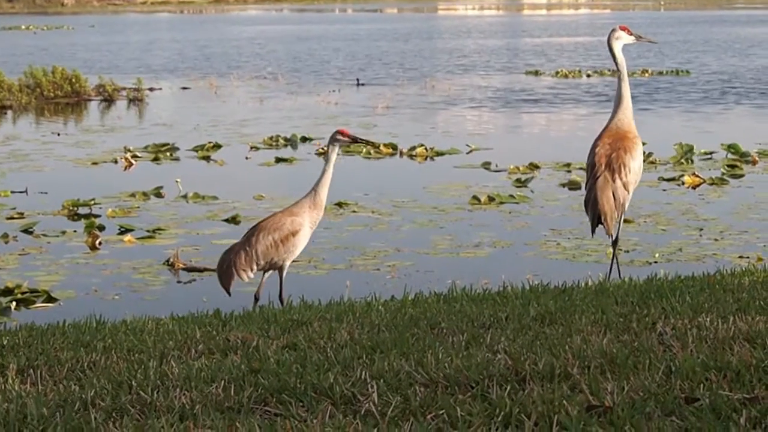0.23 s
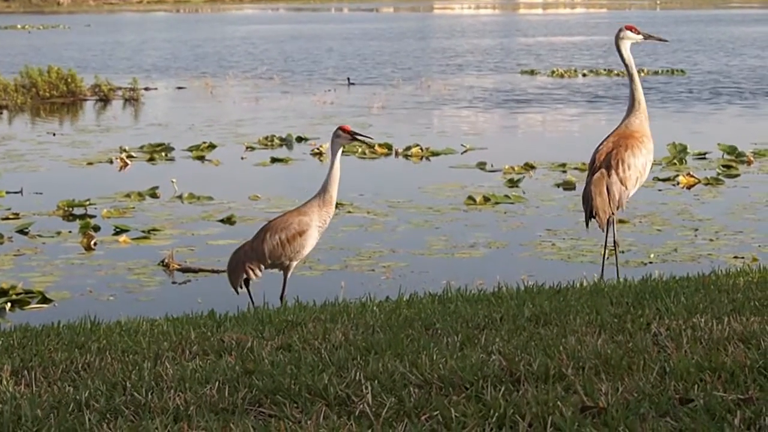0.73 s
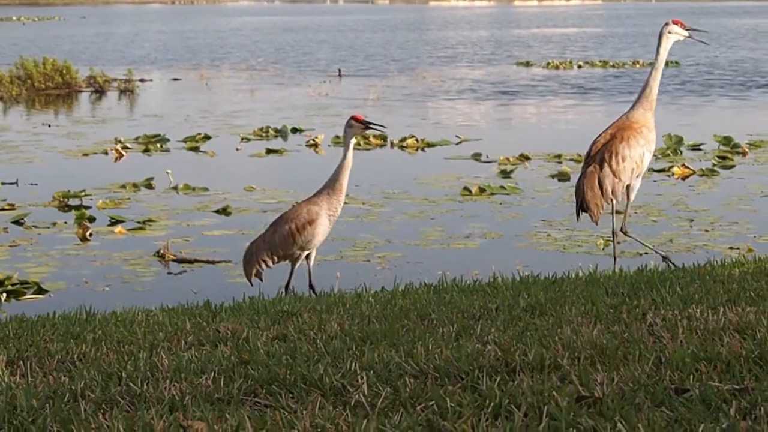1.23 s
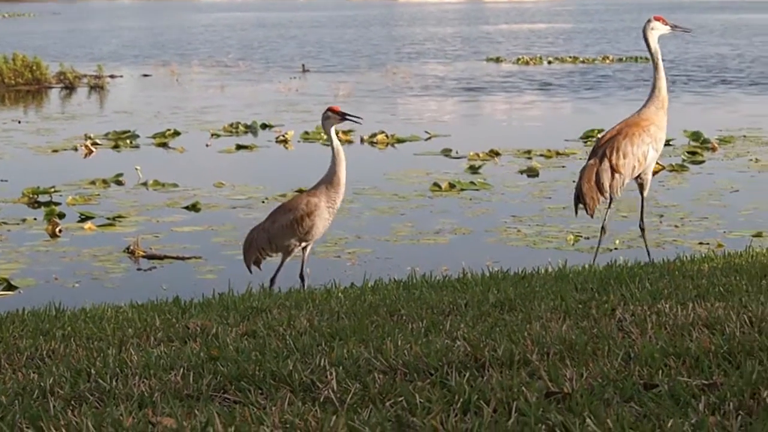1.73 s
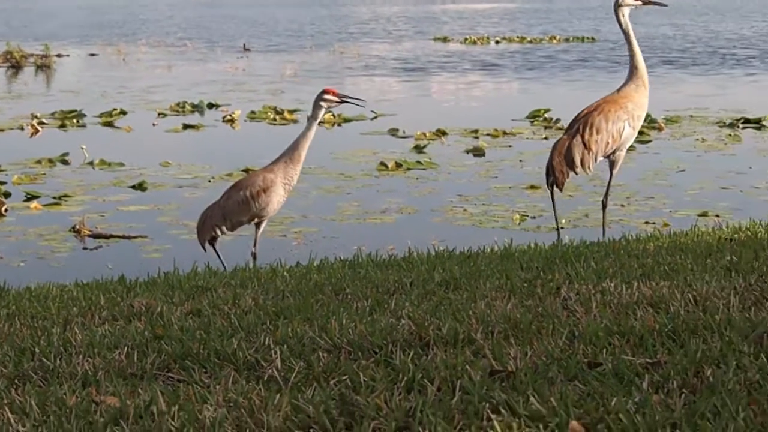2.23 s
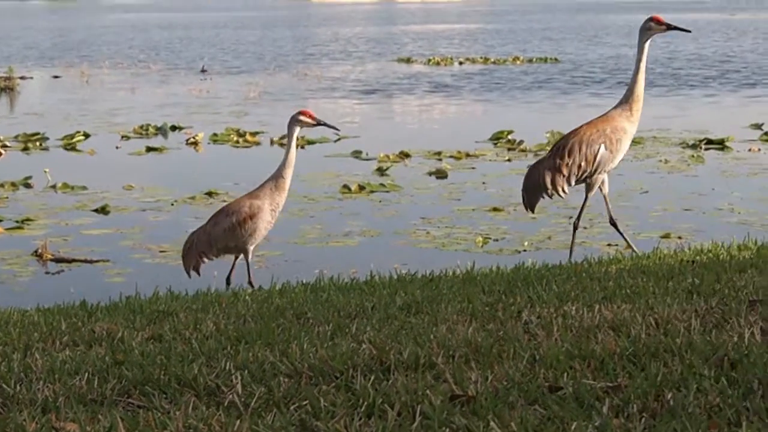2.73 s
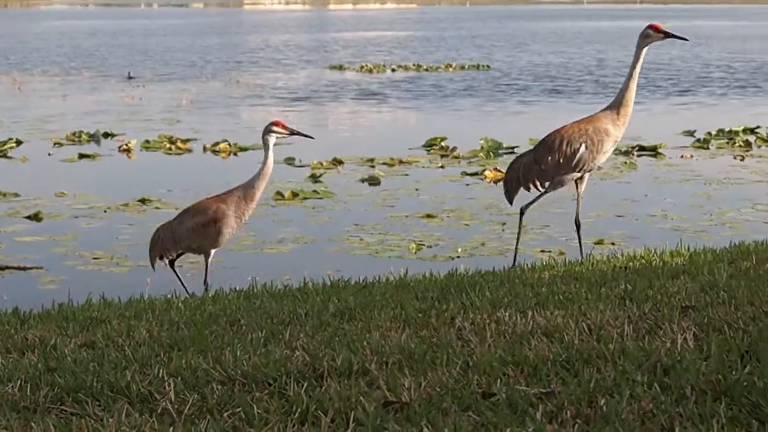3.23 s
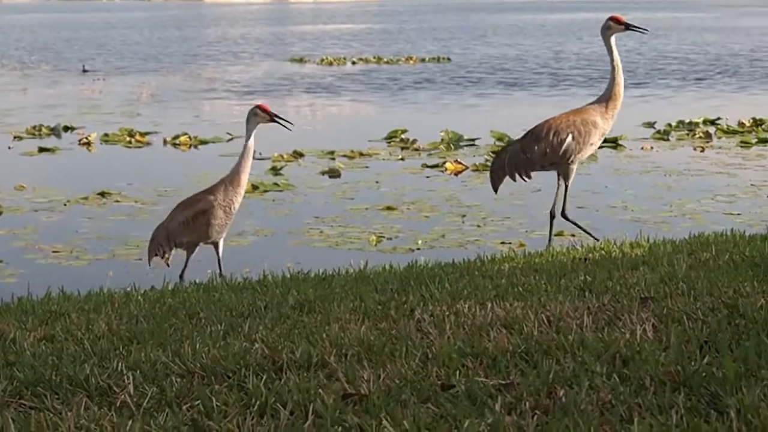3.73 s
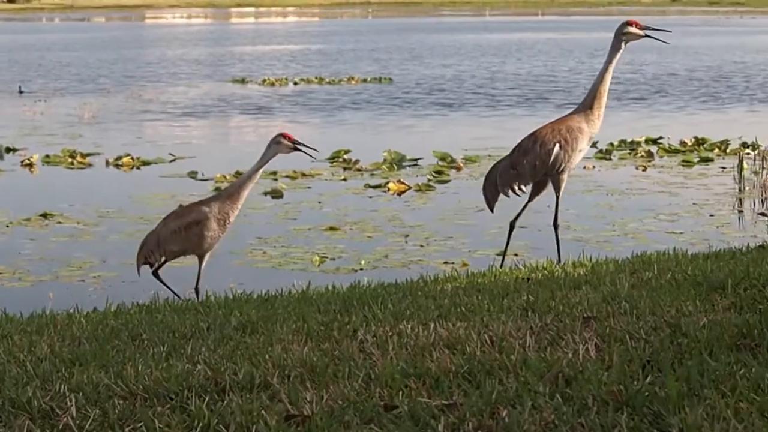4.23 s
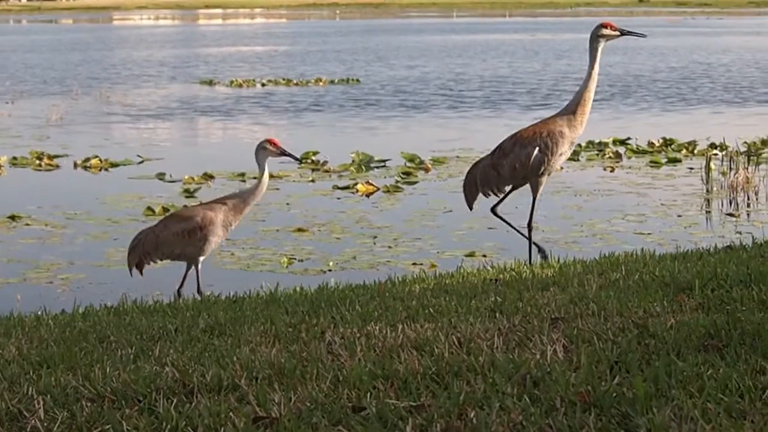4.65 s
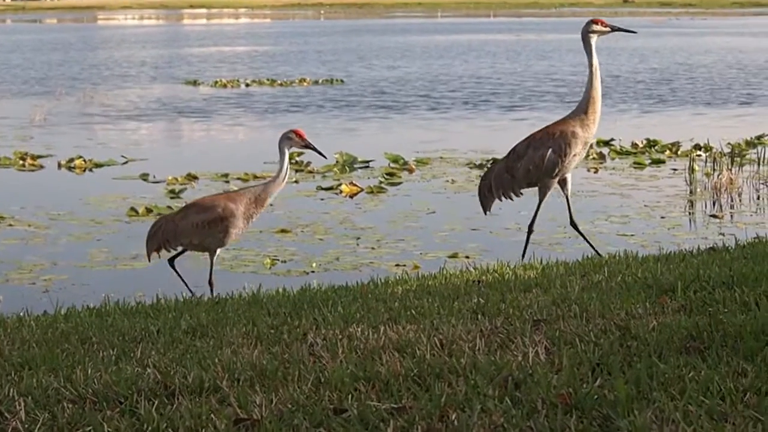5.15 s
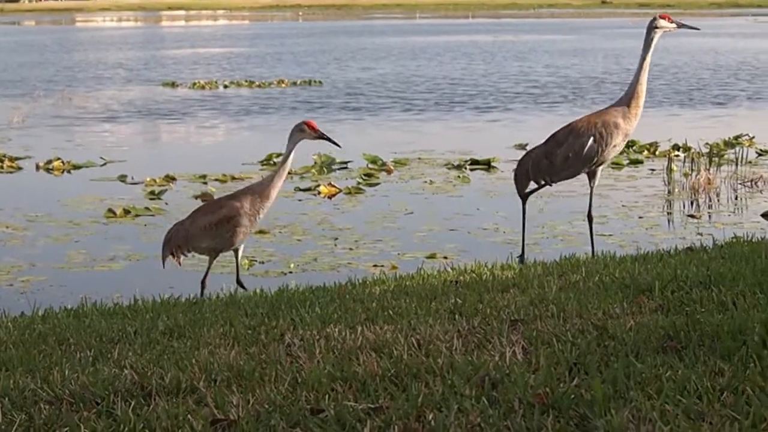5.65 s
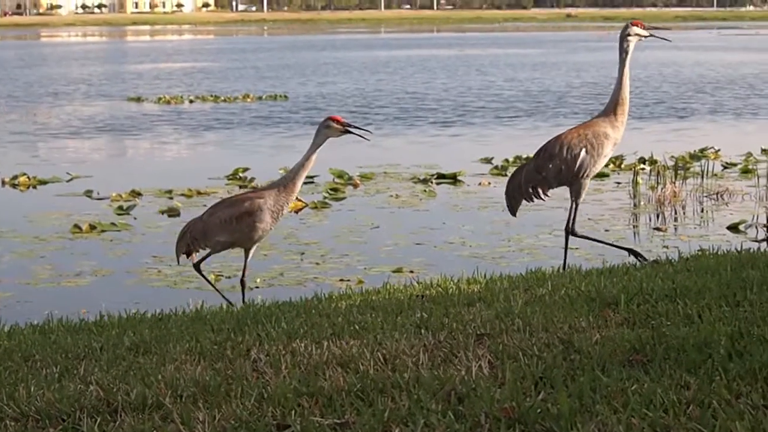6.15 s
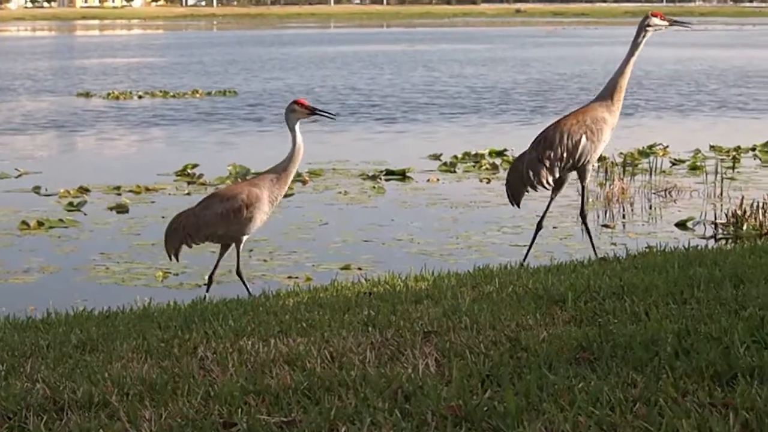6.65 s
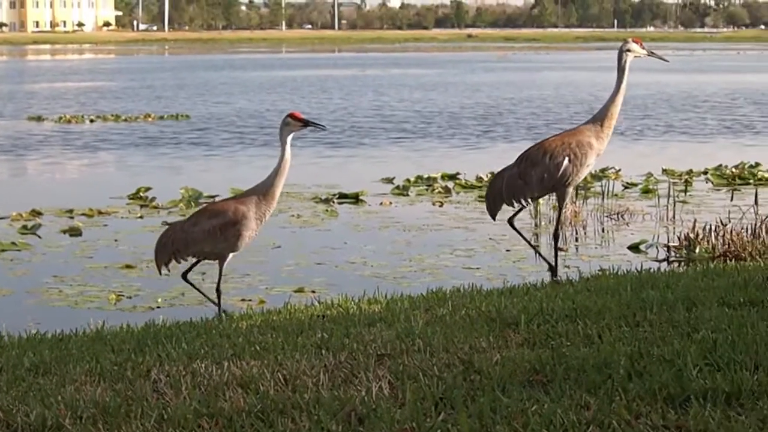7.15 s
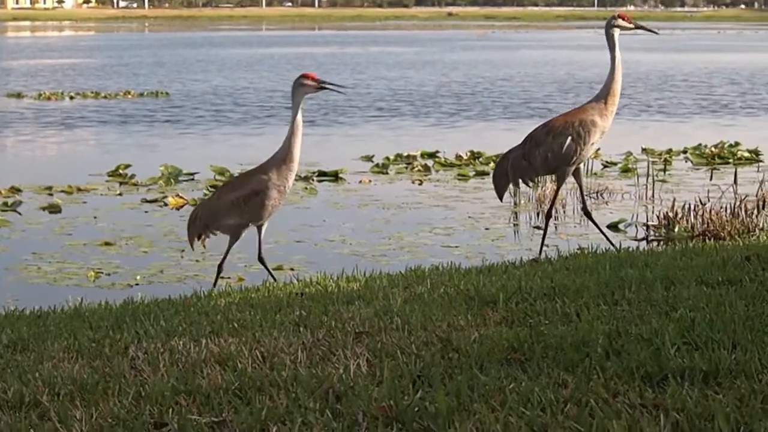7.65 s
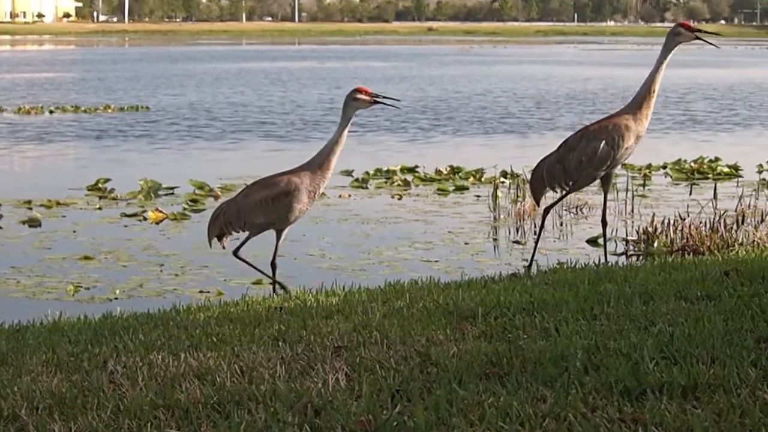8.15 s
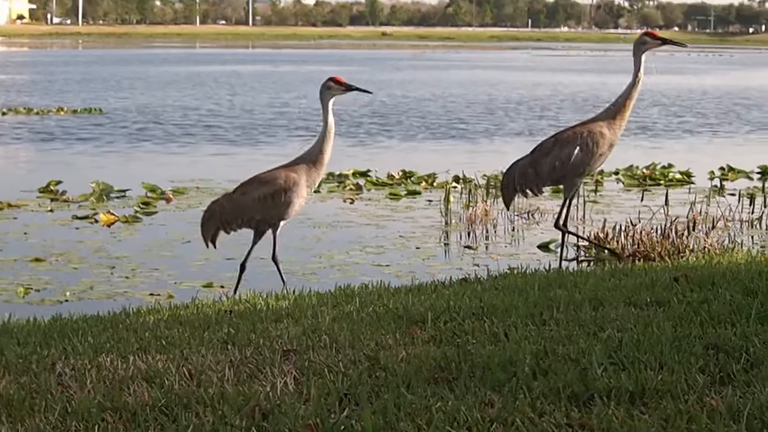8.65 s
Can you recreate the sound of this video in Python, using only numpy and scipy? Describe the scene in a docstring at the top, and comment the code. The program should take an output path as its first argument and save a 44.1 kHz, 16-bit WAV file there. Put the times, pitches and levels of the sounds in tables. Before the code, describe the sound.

Outdoors at a lake shore, a faint distant hush and a low engine hum open the scene, the hum fading by 1.5 s; a tiny chirp falls at 0.2. From 0.6 s a crane gives a short honk and a rough, hollow rolling rattle, joined at 1.1 by a second bird's tighter, clearer clucking roll. Another honk and shorter rattle follow at 1.8-2.3. Low wind rumbles through the pause, with dry ticks at 2.65 and 3.5. The duet returns at 3.65-4.4, both rattles overlapping, then wind swells, thumping the microphone around 4.9-5.6. A third duet runs 5.7-6.6, falling in level. Wind surges again with a sharp tick at 6.95, a faint chirp at 7.1 and heavy thumps to 7.5. A last overlapping duet fills 7.6-8.3, leaving slight echoes, a small chirp and strong wind blows until about 8.9.

```python
"""Two cranes call in duet on a lake shore: held notes, and rolls of short voiced bursts that ring on
in the coiled windpipe. Harmonic series through throat resonances make the voices; a comb makes the
pipe and decaying noise the shore's faint echoes. Small birds chirp and dry ticks sound nearby.
Shaped noise makes wind and distant hush; summed engine orders hum at first. Limiters duck
everything, the hush included, when birds or wind are strong."""
import sys
import numpy as np
from scipy import signal
from scipy.io import wavfile
from scipy.ndimage import uniform_filter1d

SR = 44100
rng = np.random.default_rng(int(sys.argv[2]) if len(sys.argv) > 2 else 0)


def invert_db(level):
    """Linear amplitude ratio for a level in decibels (20 dB per decade), elementwise."""
    return 10 ** (np.asarray(level, dtype=float) / 20)


def wav_out(sig):
    """Save sig, one row per channel (or a flat mono array), as 16-bit PCM at SR to the path in sys.argv[1]."""
    wavfile.write(sys.argv[1], SR, np.round(np.clip(np.atleast_2d(sig).T, -1, 1) * 32767).astype(np.int16))


N = 392914

# Throat resonances of held notes and the thin call. Each row: frequency in Hz, overtone level in dB.
NOTE_THROAT = [(240, -36.5), (400, -4), (558, 0), (1120, 7), (2920, -8), (3890, -9.5), (4810, -15),
               (6040, -19.5), (9520, -24.5), (12500, -43), (15000, -45)]


def evened(x):
    """Normalization: scales to unit rms."""
    return x / np.sqrt(np.mean(x ** 2) + 1e-20)


def read(points, hz):
    """Spectral envelope: interpolates levels along a log-frequency axis."""
    f, value = np.transpose(points)
    return np.interp(np.log(hz + 1), np.log(f + 1), value)


def add(mix, s, sound):
    """Superposition: adds a sound into the mix, starting at time s."""
    part = mix[round(s * SR):][:len(sound)]
    part += sound[:len(part)]


def smoothed_twice(x, size):
    """Low-pass filtering: two running means along the last axis."""
    return uniform_filter1d(uniform_filter1d(x, size=size), size=size)


def voice(hz, rough, throat, lag, dull_db=0):
    """Source and filter: sharp closures of the voice box excite the throat, with breath each cycle."""
    jitter = 1 + 0.75 * rough * smoothed_twice(rng.standard_normal(len(hz)), 30)
    turns = np.cumsum(hz * jitter) / SR
    k = np.arange(1, 15000 // hz.max())[:, None]  # harmonic numbers
    # the throat never sets twice alike
    uneven_db = 1.6 * rng.standard_normal(k.shape)
    heights = invert_db(read(throat, k * hz) - dull_db * np.log2(k) + uneven_db)
    # upper overtones trail unevenly
    delay = lag * np.log(k) * (1 + .5 * rng.standard_normal(k.shape))
    phase = 2 * np.pi * k * turns
    buzz = -(heights * np.cos(phase - delay)).sum(axis=0)
    # breath smears the overtones, the lowest tone stays clear
    smear = smoothed_twice(rng.standard_normal((len(k), len(hz))), 26)
    puff = (heights * np.where(k == 1, -.075, smear) * np.cos(phase)).sum(axis=0)
    return evened((1 - rough) * evened(buzz) + rough * evened(puff))


def bursts(rolls, breath, pace, arch):
    """Breath pressure: a roll starts slowly and settles, its pitch arches and its level runs down."""
    settle, last_ms, slowing = pace  # bursts to settle, last gap longer by ms, bursts of slowing
    # place of the highest pitch (0-1), shares lower at start and end, lateness of the level's fall
    top, start_lower, end_lower, lateness = arch
    rows = []
    for (start, count, gap_ms, first_ms), (db, first_db, fall_db, hz) in zip(rolls, breath):
        k = np.arange(count)
        gaps = gap_ms + first_ms * np.exp(-k[:-1] / settle) + last_ms * np.exp(-k[-2::-1] / slowing)
        times = start + np.append(0, np.cumsum(gaps)) / 1000
        u = k / k[-1]
        rising = start_lower * (1 - u / top) ** 2
        falling = end_lower * ((u - top) / (1 - top)) ** 2
        lower = np.where(u < top, rising, falling)
        chance_db, chance_pitch = rng.standard_normal((count, 2)).T
        levels_db = db - first_db * (k == 0) - fall_db * u ** lateness + 1.16 * chance_db
        rows += zip(times, levels_db, hz * (1 - lower + 0.0207 * chance_pitch))
    return rows


def rattle(rows, mean_ms, throat, sag, fade_db, rough, flutter_db, dull_db):
    """Relaxation oscillation: each burst starts hard, flutters, drops, roughens and fades as air runs out."""
    out = np.zeros(N)
    for s, db, hz in rows:
        length = round(mean_ms * rng.uniform(.85, 1.15) * SR / 1000)
        ms = np.arange(length) * 1000 / SR
        u = ms / ms[-1]
        # the voice catches again every few ms, lower each time
        stroke = ms / rng.uniform(6.47, 8.8)
        pitch = hz * (1.01 - sag * uniform_filter1d(np.floor(stroke), size=90) - 0.046 * (stroke % 1))
        edges = np.minimum(ms / 0.72, 1) * np.minimum((1 - u) / 0.51, 1)
        shape = edges * invert_db(-fade_db * u - flutter_db * (stroke % 1) ** 2)
        # treble dies first, and soft bursts are duller (dB per octave)
        dull = dull_db * u + .18 * (-12 - db)
        add(out, s, invert_db(db) * shape * voice(pitch, rough * (.5 + u), throat, .7, dull))
    return out


def notes():
    """Register break: a low creak may come first, then the voice scoops into a clear tone."""
    # Both birds' notes. Each row: start in seconds, creak in seconds, hold in seconds,
    # nominal level in dB, pitch in Hz that the scoop approaches.
    held_notes = [(0.605, 0.024, .029, -16.5, 530), (1.053, 0.0012, 0.032, -18, 770),
                  (1.794, 0.0048, 0.062, -13, 574.5), (3.651, .031, .026, -17, 536.6),
                  (3.78, 0.0073, 0.04, -15, 611), (5.681, 0.0049, 0.041, -21.5, 522),
                  (6.017, 0.0045, 0.034, -22.5, 802), (7.567, .033, .024, -17.5, 541.5),
                  (7.84, 0.0066, 0.03, -16.5, 802)]
    creak_pitch, creak_db = .67, -3.5  # ratio and level change of a full creak
    creak_rough, clear_rough = .35, .11
    break_s, release_s, onset_s = .004, 0.0094, 0.0015
    scoop, scoop_share = .07, .15  # share of the pitch, time constant as a share of the hold
    swell_db, release_db = -1.5, -15.5
    out = np.zeros(N)
    for s, creak, hold, top_db, top_hz in held_notes:
        t = np.arange(-creak, hold, 1 / SR)
        creaky = np.clip(-t / break_s, 0, 1)
        glide = 1 - scoop * np.exp(-np.maximum(t, 0) / (scoop_share * hold))
        hz = top_hz * glide * creak_pitch ** creaky
        db = top_db + creak_db * creaky + swell_db * np.clip(1 - t / hold, 0, 1) ** 2
        db = db + release_db * np.clip(1 - (hold - t) / release_s, 0, 1)
        rough = clear_rough + (creak_rough - clear_rough) * creaky
        dull = 0.45 * (-16.5 - db)  # softer is duller
        edges = np.minimum((t + creak) / onset_s, (hold - t) / onset_s).clip(0, 1)
        add(out, s, invert_db(db) * voice(hz, rough, NOTE_THROAT, 1.0, dull) * edges)
    return out


def windpipe(x, ms, back_db):
    """Pipe reflection: sound runs down the coil and back, inverted and duller at each trip."""
    loop = np.zeros(round(ms * SR / 1000) + 2)
    loop[0] = 1
    loop[-2:] = invert_db(back_db) / 2  # the mean of two neighbouring samples dulls the return
    return signal.lfilter([1], loop, x)


def bright_bird_and_notes():
    """Pulsed phonation: long rough bursts, with both birds' held notes sent through the same pipe."""
    # Each row: start in seconds, number of bursts, settled gap in ms, extra first gap in ms.
    rolls = [(.7246, 11, 47.13, 26.7), (1.9245, 8, 44.72, 26.04), (3.7727, 11, 48.91, 23.09),
             (5.7841, 12, 48.97, 22.83), (7.687, 12, 47.85, 25.63)]
    # Each row, one a roll: nominal level in dB, first burst softer by dB, fall by the end in dB,
    # nominal top pitch in Hz.
    breath = [(-8.5, 0.4, 5, 960), (-9.5, 0.7, 5.5, 905), (-9, 0.5, 7.5, 935), (-8.5, 5.5, 11, 900),
              (-7, -0.9, 10, 915)]
    # Each row: frequency in Hz, overtone level in dB.
    throat = [(350, -37), (600, 2.5), (1360, -11), (1740, -6.5), (2860, -15), (4230, -13.5), (5610, -25.5),
              (6600, -15.5), (7860, -26.5), (9880, -24.5), (12600, -40.5), (15000, -49)]
    rows = bursts(rolls, breath, pace=(3.5, -.97, 1.4), arch=(0.455, .17, .21, 2.1))
    rolling = rattle(rows, 28, throat, sag=.065, fade_db=11, rough=.48, flutter_db=3.7, dull_db=3.6)
    return windpipe(rolling + notes(), 7.8, -11.5)


def mellow_bird():
    """Pulsed phonation: short clear bursts, in rolls and single, ring in a longer windpipe."""
    # Each row: start in seconds, number of bursts, settled gap in ms, extra first gap in ms.
    rolls = [(1.1594, 8, 47.26, 15.56), (3.8953, 9, 45.29, 17.01), (6.1348, 8, 49.01, 11.16),
             (7.9483, 7, 44.5, 18)]
    # Each row, one a roll: nominal level in dB, first burst softer by dB, fall by the end in dB,
    # nominal top pitch in Hz.
    breath = [(-9.5, -2, 1.1, 1000), (-7.5, -7, 2.5, 1017), (-10, .6, 1.5, 1010), (-7.5, 3.8, 4.7, 1100)]
    # High single bursts near a roll; the faint one at 8.39 s is an echo.
    # Each row: start in seconds, nominal level in dB, nominal pitch in Hz.
    single = [(1.1013, -11, 983), (1.616, -16.5, 1064), (4.388, -20, 1050), (6.5977, -17.5, 1044),
              (8.39, -24, 1010)]
    # Each row: frequency in Hz, overtone level in dB.
    throat = [(600, -3), (1000, 4.5), (1900, -6.5), (4000, -13), (6500, -15.5), (8500, -24), (15000, -54)]
    rows = bursts(rolls, breath, pace=(2.23, 8.34, 3.), arch=(0.34, 0.044, 0.13, 2.7)) + single
    rolling = rattle(rows, 9.5, throat, sag=.02, fade_db=2.8, rough=.2, flutter_db=1.9, dull_db=6)
    return windpipe(rolling, 9.5, -12.5)


def cranes():
    """Radiation: a small bill radiates no bass, so a high-pass follows both pipes."""
    bill = signal.butter(4, 560, "high", fs=SR, output="sos")
    return signal.sosfiltfilt(bill, bright_bird_and_notes() + mellow_bird())


def chirps():
    """Frequency modulation: small birds whistle blurred glides."""
    # Each row: start in seconds, length in seconds, peak level in dB, start pitch in Hz,
    # end pitch in Hz, rms blur of the pitch in Hz.
    glides = [(0.226, .078, -45, 3750, 2400, 40), (7.075, 0.068, -39.5, 6000, 7500, 500),
              (8.648, 0.041, -33, 5900, 6300, 880)]
    out = np.zeros(N)
    for s, length, db, start_hz, end_hz, blur_hz in glides:
        u = np.linspace(0, 1, round(length * SR))
        blur = evened(uniform_filter1d(rng.standard_normal(len(u)), size=30))
        hz = start_hz + (end_hz - start_hz) * u + blur_hz * blur
        swell = np.sqrt(np.sin(np.pi * u ** 1.5))
        add(out, s, invert_db(db) * swell * np.sin(2 * np.pi * np.cumsum(hz) / SR))
    return out


def thin_call():
    """Spectral tilt: a faint call buzzes thinly because its overtones are raised."""
    # One row: start in seconds, length in seconds, level in dB, pitch in Hz, dullness in dB per octave.
    s, length, db, hz, dull_db = (7.312, .03, -39, 710, -5.5)
    out = np.zeros(N)
    held = np.ones(round(length * SR))
    edges = signal.windows.tukey(len(held), .3)
    add(out, s, invert_db(db) * edges * voice(hz * held, .25 * held, NOTE_THROAT, .86, dull_db))
    return out


def ticks():
    """Impulsive excitation: dry ticks nearby are noise that decays by 60 dB in 15 ms."""
    # Each row: start in seconds, peak level in dB.
    snaps = [(0.089, -29), (2.65, -28.5), (3.482, -19.5), (5.7708, -20), (6.9522, -14)]
    out = np.zeros(N)
    for s, db in snaps:
        noise = np.diff(uniform_filter1d(rng.standard_normal(301), size=3))
        snap = noise * invert_db(-60 * np.arange(300) / SR / 0.015)
        add(out, s, invert_db(db) * snap / abs(snap).max())
    return out


def shore(x, near_db, near_t60, far_db, far_t60):
    """Reverberation: a short bright scatter off grass and water, a long dull tail, a smeared echo."""
    # Each row: echo delay in seconds, level in dB.
    echoes = [(.104, -32.5)]
    hz, t, z = signal.stft(rng.standard_normal(SR), SR, nperseg=256)
    hz = hz[:, None]
    near = invert_db(near_db - 60 * t / near_t60) * (0.21 + 0.94 / (1 + ((hz - 6500) / 1600) ** 2))
    far = invert_db(far_db - 60 * t / far_t60) / (1 + (hz / 1300) ** 3)
    onset = np.minimum(t / 0.0097, 1)
    tail = signal.istft(z * (near + far) * onset, SR, nperseg=256)[1]
    smear = signal.windows.hann(400) * uniform_filter1d(rng.standard_normal(400), size=24)
    for delay, db in echoes:
        add(tail, delay, invert_db(db) * smear / np.linalg.norm(smear))
    return signal.oaconvolve(x, tail)[:N]


def shaped_noise(points, patchy_db, size):
    """Spectral synthesis: random short-time spectra with drifting patches."""
    frames, hz = 4 * N // size + 5, np.fft.rfftfreq(size, 1 / SR)
    a, b, patches = rng.standard_normal((frames, len(hz), 3)).T
    patches = uniform_filter1d(patches, size=12, axis=0)
    patches = evened(uniform_filter1d(patches, size=8, axis=1))
    z = (a + 1j * b) * invert_db(read(points, hz)[:, None] + patchy_db * patches)
    return evened(signal.istft(z, nperseg=size, noverlap=size * 3 // 4)[1][:N])


def wind():
    """Turbulence: low lumpy pressure that the capsule rounds off; strong gusts add a higher flutter."""
    # Each row: time in seconds, nominal level in dB.
    gust_levels = [(0, -23), (.71, -23), (.9, -35.5), (1.52, -27), (1.68, -16.5), (2.07, -22.5),
                   (2.412, -16.5), (3.53, -16), (3.74, -21), (3.92, -31), (4.52, -29), (4.67, -16),
                   (5.55, -6), (5.78, -13), (6.27, -39), (6.48, -29), (6.74, -10.5), (7.48, -6.5),
                   (7.6, -16), (8.15, -23), (8.36, -7), (8.91, -9.5)]
    # Brief lulls between gusts. Each row: centre in seconds, depth in dB, half width in seconds.
    lulls = [(2.35, 8.5, 0.032), (2.75, 6, 0.13), (3.27, 6, 0.12), (4.74, 8, 0.08), (4.96, 5, 0.13),
             (5.23, 9.5, 0.18), (5.428, 15.5, 0.062), (6.84, 11, 0.09), (7.01, 19, 0.07)]
    # Each row: frequency in Hz, relative density in dB per Hz.
    gust_spectrum = [(12, -43), (20, -14.5), (76, 1), (129, 2), (267, -14.5), (450, -45), (580, -64),
                     (990, -120)]
    now = np.arange(N) / SR
    level_db = np.interp(now, *np.transpose(gust_levels))
    for at, depth_db, half in lulls:
        level_db = level_db - depth_db * np.maximum(1 - abs(now - at) / half, 0)
    level = invert_db(level_db)
    lumps = evened(smoothed_twice(rng.standard_normal(N), 900))
    eddies = evened(smoothed_twice(rng.standard_normal(N), 300))
    buffet = evened(shaped_noise(gust_spectrum, 1.1, size=2048) * invert_db(2.96 * lumps))
    band = signal.butter(3, [160, 290], "band", fs=SR, output="sos")
    flutter = signal.sosfilt(band, rng.standard_normal(N))
    flutter = evened(flutter * invert_db(15.0 * np.clip(eddies, -2, 2)))
    rounded = 2.8 * np.tanh(buffet / 2.8)
    return level * rounded + invert_db(1.5) * level ** 2 * flutter


def slaps():
    """Transient pressure: sharp eddies slap the microphone as brief pulses of either sign."""
    # Each row: time in seconds (the peak comes 3 ms later), peak level in dB.
    hits = [(4.92, -3.5), (5.116, -8), (5.38, -2), (7.124, 6), (7.413, 3), (7.467, 6.5), (8.66, 9.5),
            (8.732, 6), (8.773, 6.5)]
    out = np.zeros(N)
    t = np.arange(-400, 400) / SR
    for s, db in hits:
        slap = np.exp(-abs(t) / 0.0021) * np.cos(2 * np.pi * 170 * t) * rng.choice([-1, 1])
        add(out, s - .006, invert_db(db) * slap)
    return out


def hum():
    """Harmonic superposition: slightly wavering orders of a far engine fade away."""
    # Each row: time in seconds, level in dB.
    fade = [(0, -25), (.7, -26), (1.5, -42)]
    # Each row: multiple of 73 Hz, mean relative level in dB.
    orders = [(1, -8), (2.0, 0), (3, -12), (4, -21)]
    t = np.arange(N) / SR
    waver = evened(uniform_filter1d(rng.standard_normal((len(orders), N)), size=4000, axis=1))
    tone = np.zeros(N)
    for (k, db), w in zip(orders, waver):
        tone += invert_db(db + 2.5 * w) * np.cos(2 * np.pi * (k * 73 * t + .06 * w))
    return evened(tone) * invert_db(np.interp(t, *np.transpose(fade), right=-120))


def hush():
    """Incoherent sum: far traffic and the lake blend into steady coloured noise."""
    # Each row: frequency in Hz, relative density in dB per Hz.
    far_spectrum = [(260, -30), (450, -12.5), (633, -1.5), (889, -4.5), (1890, -9.5), (2190, -9),
                    (2910, -13), (5500, -25), (7070, -23), (14200, -31.5), (15500, -44)]
    return invert_db(-41) * shaped_noise(far_spectrum, .9, size=1024)


def scene():
    """Superposition: cranes and small sounds, their echoes from the shore, and the air around."""
    near = cranes() + chirps() + thin_call() + ticks()
    echoes = shore(near, near_db=-34.5, near_t60=0.5, far_db=-54.5, far_t60=2.8)
    air = wind() + slaps() + hum() + hush()
    return (near + echoes + air)[None]


def limited(x, sensed, ceiling_db, release_db, share):
    """Gain reduction: takes off a share of the sensed excess, then regains at a release in dB a second."""
    level_db = 20 * np.log10(abs(uniform_filter1d(abs(sensed), size=24)) + 1e-9)
    release = np.arange(N) * release_db / SR
    held_db = np.maximum.accumulate(level_db + release) - release
    over_db = np.maximum(held_db - ceiling_db, 0)
    early = np.append(over_db[20:], np.zeros(20))  # looks half a millisecond ahead
    return x / invert_db(share * uniform_filter1d(early, size=30))


def band_limit(x):
    """A steep low-pass at the top of the band."""
    return signal.sosfilt(signal.butter(12, 16330, fs=SR, output="sos"), x)


def record(dry):
    """Dynamic control: slow gain, a fast bass-sensing limiter, then a dip near 8 kHz and a dull top."""
    slow = limited(dry[0], dry[0], ceiling_db=-8.5, release_db=24.0, share=0.6)
    bass = signal.sosfiltfilt(signal.butter(2, 450, fs=SR, output="sos"), slow)
    held = limited(slow, bass, ceiling_db=-7.5, release_db=250., share=1)
    dipped = signal.lfilter(*signal.iirnotch(7900, 22, SR), np.clip(held, -1, 1))
    dulled = signal.sosfilt(signal.cheby1(10, .5, 14700, fs=SR, output="sos"), dipped)
    return band_limit(dulled[None])


dry = scene()
out = record(dry)
wav_out(out)
```